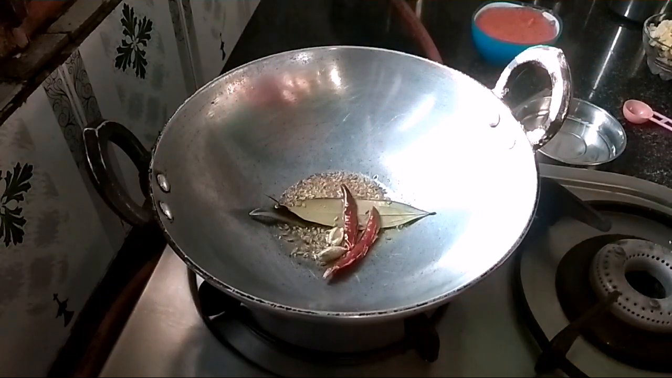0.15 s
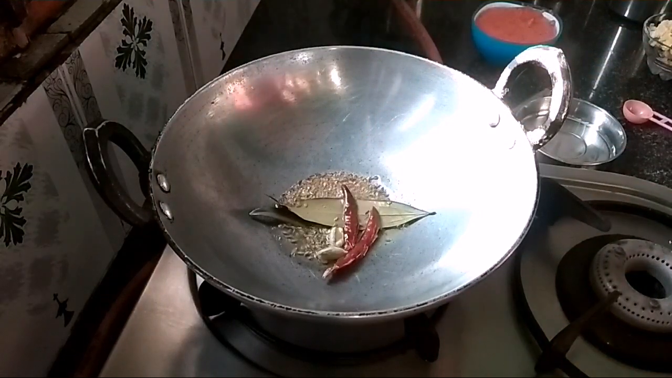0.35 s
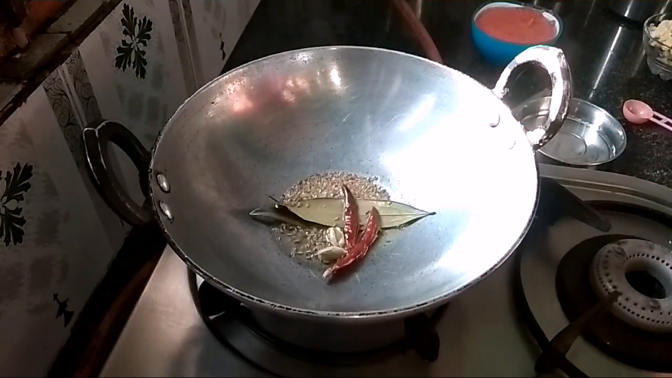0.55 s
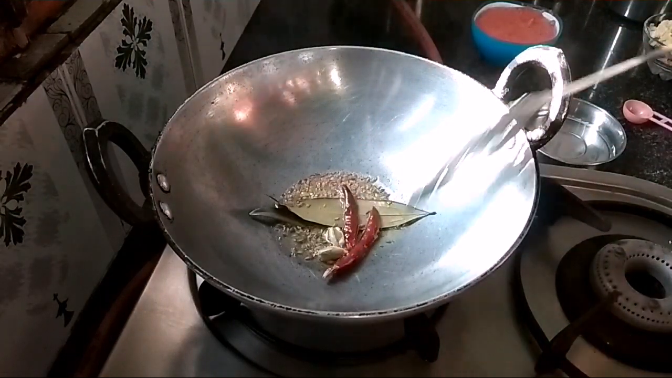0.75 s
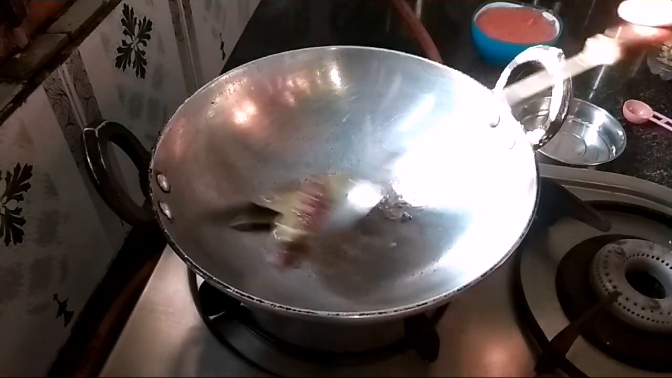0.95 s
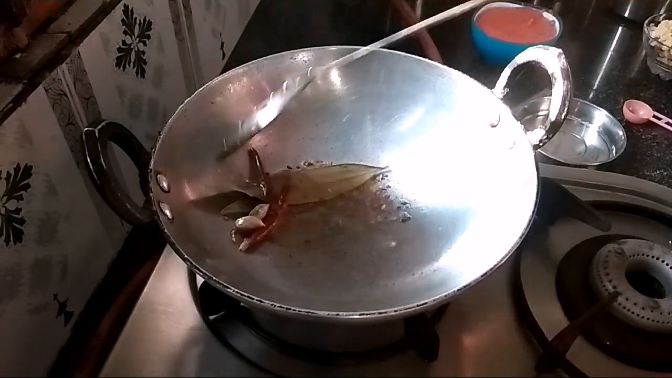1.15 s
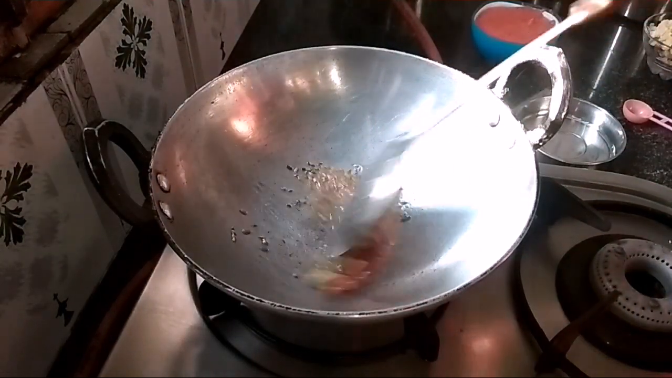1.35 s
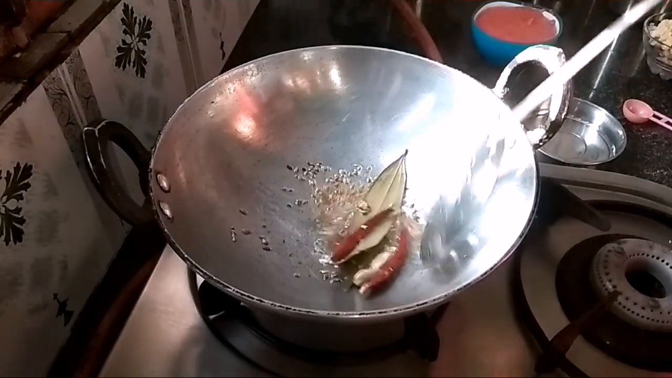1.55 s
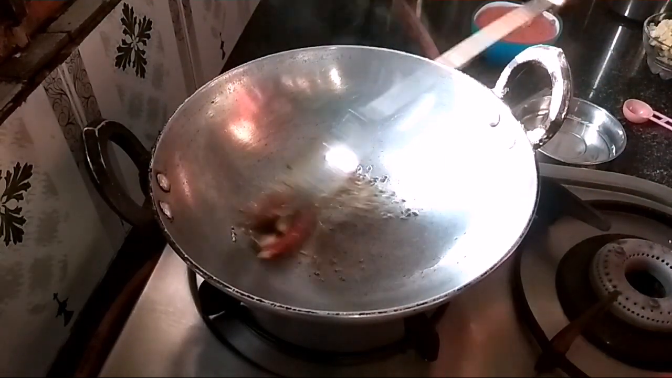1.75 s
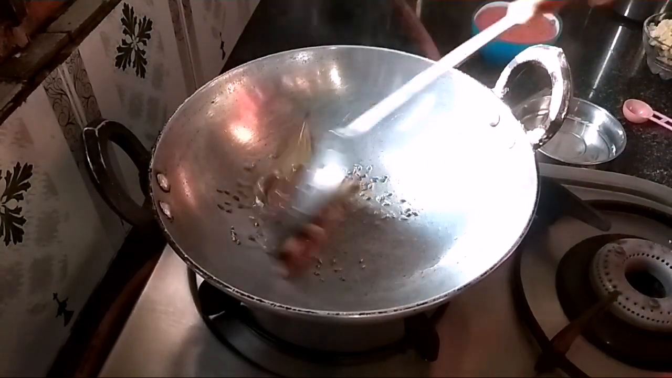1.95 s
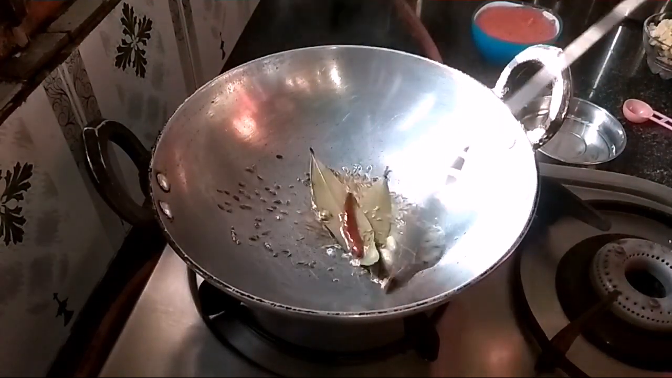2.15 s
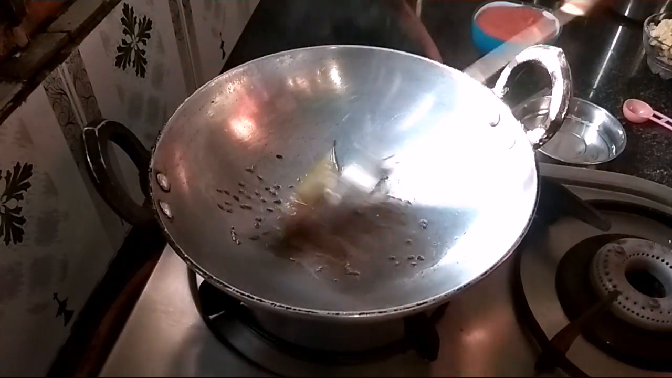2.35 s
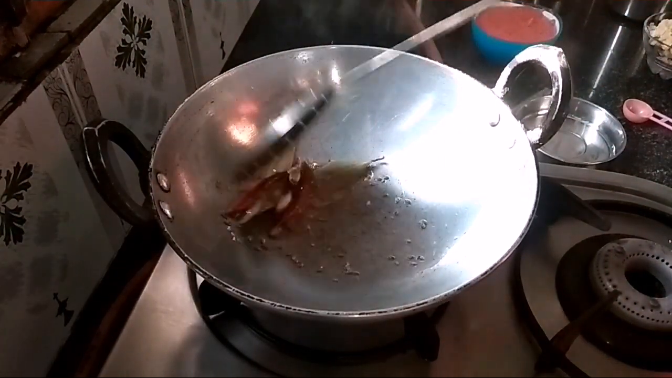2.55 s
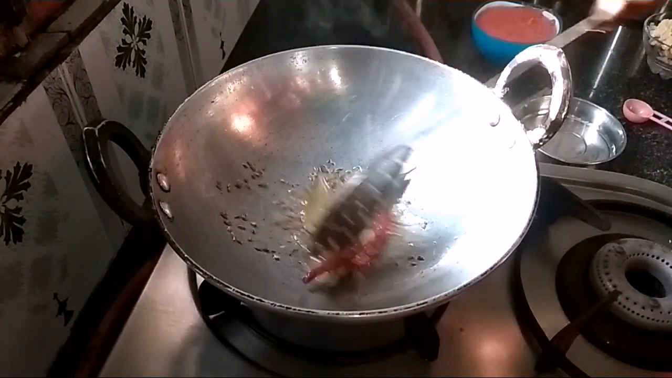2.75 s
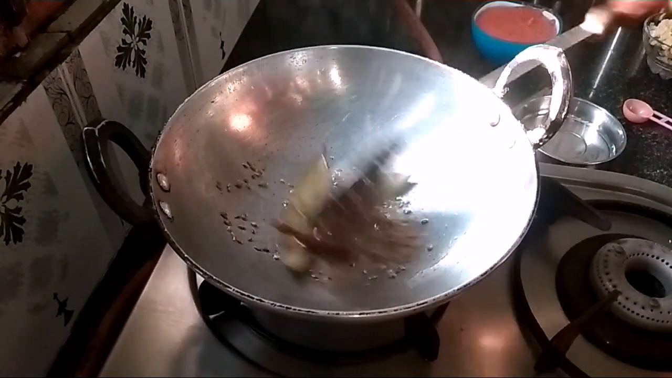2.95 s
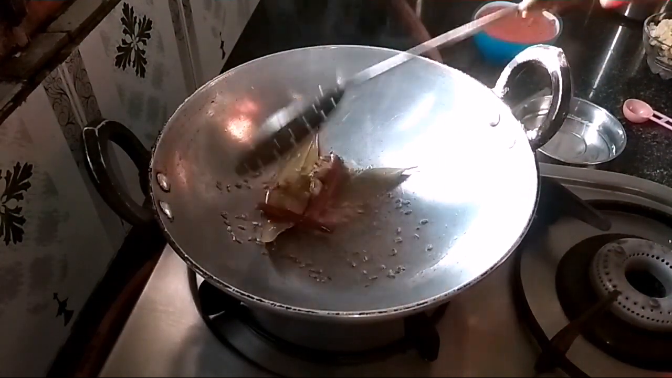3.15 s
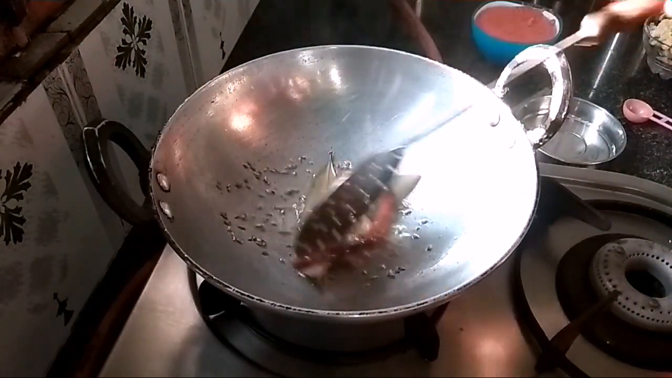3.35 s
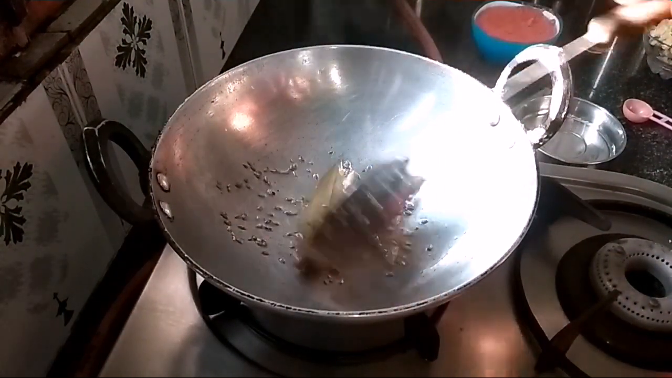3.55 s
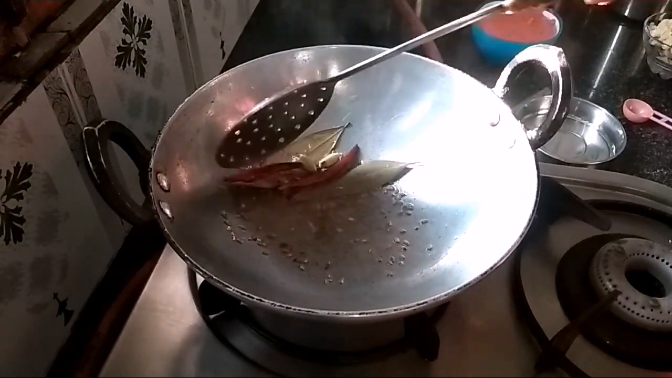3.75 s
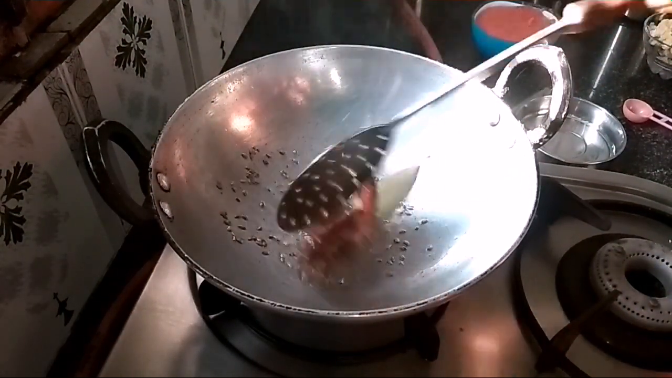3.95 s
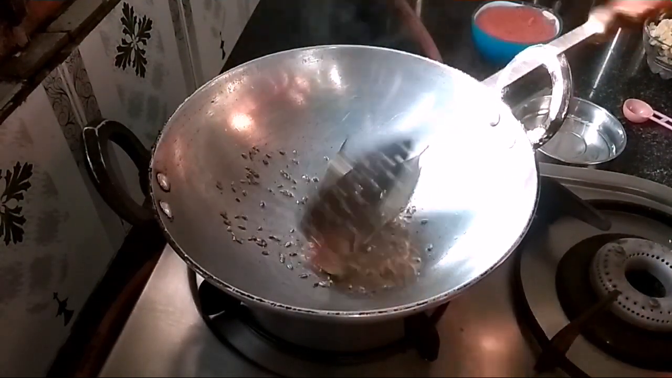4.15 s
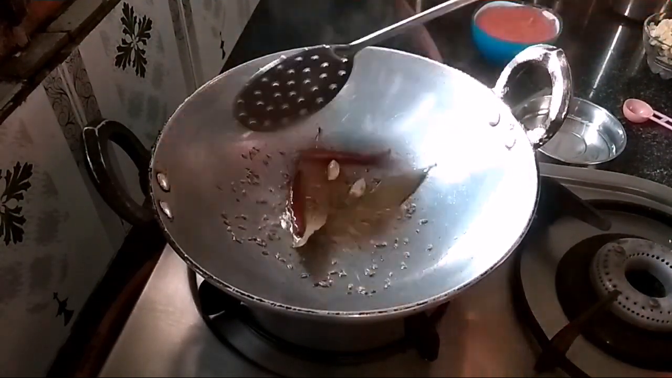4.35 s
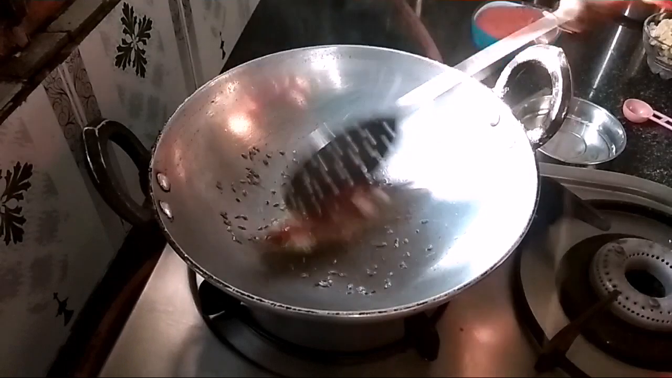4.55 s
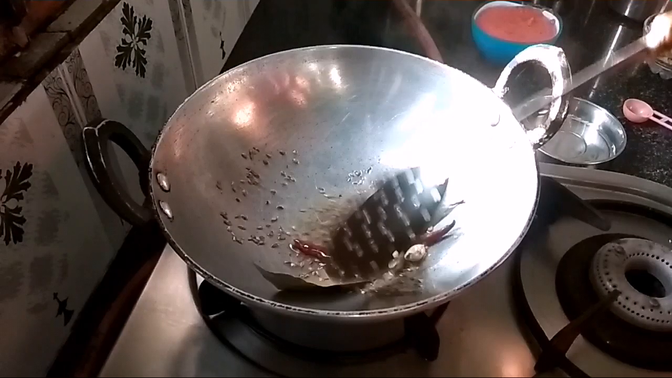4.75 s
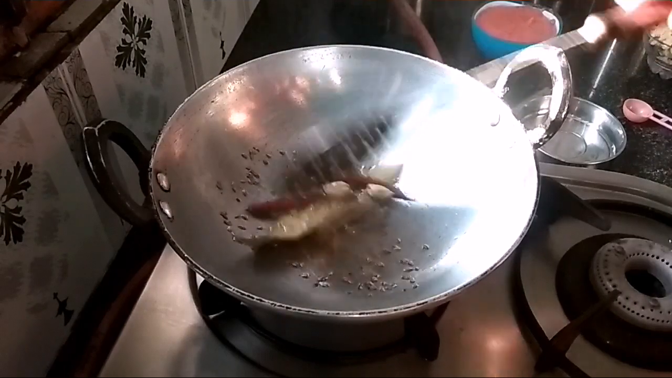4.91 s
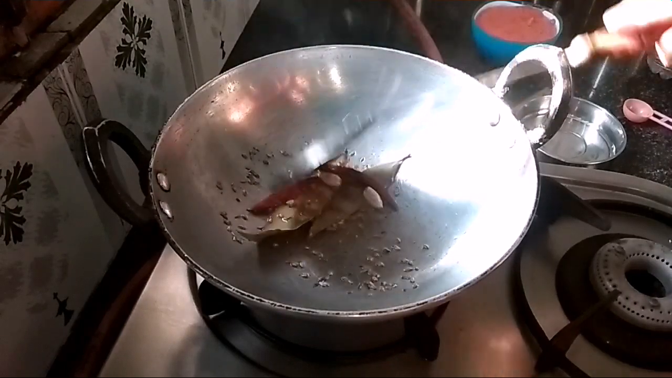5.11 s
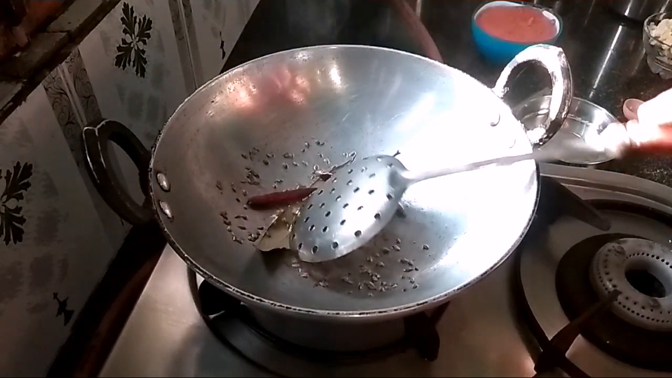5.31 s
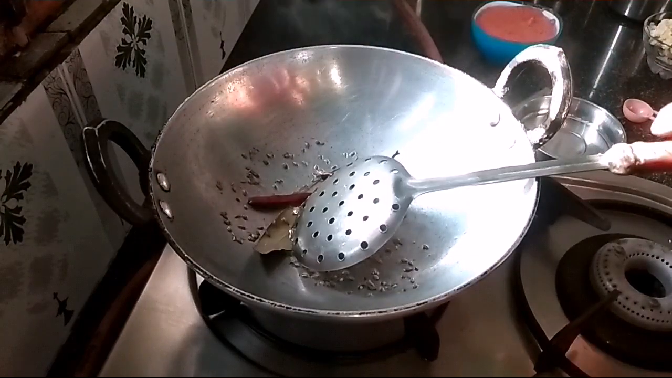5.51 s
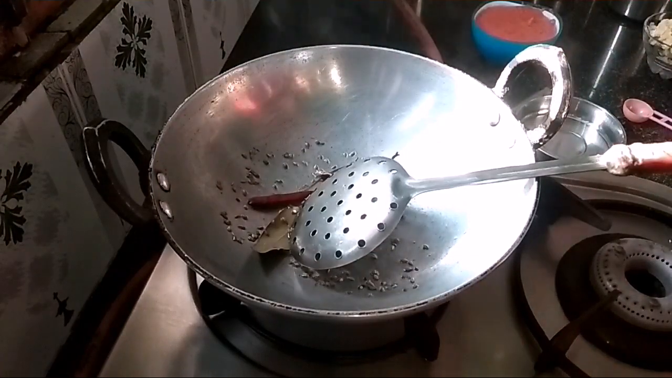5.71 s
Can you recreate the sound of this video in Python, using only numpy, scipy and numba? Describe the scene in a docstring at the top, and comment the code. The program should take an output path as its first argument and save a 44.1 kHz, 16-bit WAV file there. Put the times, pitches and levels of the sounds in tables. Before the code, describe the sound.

Close frying sizzle flares with sharp pops as a metal spoon clanks in a wok, then brisk brushing strokes over a faint stove hum.

```python
"""Spices frying in ghee

Whole spices fry in a thin metal wok close to the microphone: noise clicks through band-passes fizz, short rings
pop. Noise bursts and decaying modes make a slotted steel spoon knock and scrape round the pan as the fat flares
up. From halfway on, dense clicks through gliding resonances swish to and fro like a stiff brush. Below lie a
gas burner of coloured noise, a brief draught and a low hum of steady sines, all in a small kitchen."""
import sys
import numpy as np
from scipy import signal
from scipy.fft import rfft, irfft, next_fast_len
from scipy.io import wavfile
from numba import njit

SR = 44100
rng = np.random.default_rng(int(sys.argv[2]) if len(sys.argv) > 2 else 0)


def put_to_file(sound):
    """Save the sound as 16-bit audio at rate SR, in the file named by the first command-line argument."""
    columns = np.atleast_2d(sound).T  # one column per channel
    safe = np.clip(columns, -1, 1)
    whole_steps = np.round(safe * 32767)
    wavfile.write(sys.argv[1], SR, whole_steps.astype(np.int16))


N = 254702
TIME = np.arange(N) / SR  # seconds
TAIL = TIME[:SR // 2]  # half a second for bursts and echoes

# The fat fizzes quietly, flares as the spoon spreads it over hot metal, then sinks in waves.
# Each row: time in seconds, relative level in dB.
FIZZ_LEVEL = [(0, -53.5), (.25, -56), (.45, -50.5), (.92, -54.5), (1.05, -42.5), (1.16, -37.5), (1.2, -32),
              (1.3, -25.5), (1.45, -27.5), (1.58, -28), (1.67, -32.5), (1.77, -29), (1.83, -31.5),
              (1.97, -36.5), (2.1, -32), (2.28, -39), (2.43, -38), (2.62, -35), (2.95, -42), (3.3, -41),
              (3.56, -47.5), (4.1, -41), (4.7, -45), (5.1, -46), (5.45, -52), (5.78, -61)]
# Tone of the fizz and of the spitting drops. Each row: frequency in Hz, relative level in dB.
FIZZ_COLOUR = [(290, -22), (500, -41.5), (1300, -3.5), (1460, -1.5), (2290, -3), (3340, 2.5), (4150, 2.5),
               (7750, 2), (12100, 9.5), (14900, 1.5), (16000, 4.5)]
# Bubble pitch at each frying spot. Each entry: band centre in Hz.
SPOT_HZ = [2200, 4300, 6300, 8300, 10200, 12000, 13800]
# Wet seeds sputter. Each row: start in seconds, relative level in dB, length in seconds, pitch in Hz.
SPUTTERS = [(1.184, -27, .016, 5800), (1.26, -30, .016, 10500), (1.284, -23.5, .018, 4600),
            (1.532, -22, .016, 11500), (1.854, -32, .016, 6400), (2.01, -31, .006, 7600),
            (2.026, -33, 0.011, 5200), (2.348, -33.5, .014, 5200), (5.342, -28, .006, 12200)]
# The biggest steam bubbles burst in the fat; the rows pitched near 1.5 kHz are hard seeds cracking. Each row:
# start in seconds, relative level in dB, pitch in Hz.
POPS = [(0.0142, -7, 12200), (0.018, -23, 3100), (0.056, -25, 9400), (0.0572, -26, 3060),
        (0.3693, -15.5, 2960), (0.4179, -10, 11600), (0.417, -31, 2550), (0.4995, -18.5, 10900),
        (0.497, -26.5, 3940), (0.5399, -14, 11800), (0.5448, -11, 12600), (0.6392, -14, 10400),
        (0.7672, -31, 3670), (0.82, -17.5, 10700), (0.9235, -16, 11800), (1.101, -3.5, 12400),
        (1.117, -7, 11900), (1.152, -8.5, 9800), (1.3024, 5.5, 10800), (1.433, 0, 11000),
        (1.56, -2.5, 12500), (1.6252, -11.5, 3260), (1.626, -2, 11600), (1.9187, -5, 7400),
        (2.0102, -10.5, 7400), (2.098, -19, 1620), (2.156, -8.5, 11700), (2.224, -21.5, 4560),
        (2.3482, -16.5, 4780), (2.4714, -19, 1620), (2.472, -10, 11200), (2.5308, -11.5, 7700),
        (2.5806, -12.5, 3610), (2.631, -19, 3430), (2.636, -8.5, 10300), (2.883, -7, 12000),
        (2.9337, -0.5, 10800), (3.0096, -2.5, 11700), (3.186, -19, 3450), (3.233, -12.5, 12200),
        (3.2731, -7.5, 12900), (3.295, -17, 4300), (3.38, -9, 9900), (3.8545, -14, 3110),
        (3.968, 2.5, 11000), (4.105, -13, 3430), (4.104, -11.5, 10400), (4.132, -11.5, 10200),
        (4.269, 0.5, 11200), (4.3303, 3, 11400), (4.3304, -26.5, 1600), (4.444, -17, 3900),
        (4.4743, -11, 12600), (4.54, -21, 1420), (4.7443, -7.5, 12100), (5.0479, -16, 1670),
        (5.0492, -18.5, 2770), (5.1079, -10, 11500), (5.3443, -6, 11500)]
# Drops of fat land on the microphone port.
# Each row: start in seconds, then relative levels of crack, spray and thump in dB.
SPITS = [(0.2848, -11, -29, -16), (1.436, -18, -35, -25.5)]
# The spoon strikes the pan. Each row: start in seconds, thud level in dB, upper edge of the thud in Hz,
# metallic clash level in dB, chatter decay in seconds, level of the ring left after it in dB (all relative).
KNOCKS = [(0.953, 16, 2150, 16.5, 0.011, -1), (1.3382, 15, 1630, 4, 0.0025, 1.5),
          (1.703, 8, 1950, 12, 0.0053, 0), (2.471, -2.5, 2300, -14.5, 0.0031, -4),
          (3.273, 0.5, 1500, -25, 0.0014, -42), (3.6094, 18, 1770, 13.5, 0.012, -1),
          (4.3291, 12.5, 1520, -26, 0.0015, -12), (4.54, 1, 1640, 3, 0.0019, 3.5),
          (4.9016, 17.5, 1760, 12.5, 0.0026, -3), (5.512, -6, 795, 0.5, 0.012, 4)]
# The spoon is dragged over the metal.
# Each row: start in seconds, time pressed in seconds, relative level in dB, upper edge in Hz.
DRAGS = [(1.284, .012, -22, 1900), (1.349, 0.079, -22, 1370), (1.44, 0.2, -29.5, 550),
         (1.519, 0.017, -26, 1930), (2.043, 0.027, -18.5, 890), (2.315, 0.041, -26, 490),
         (2.786, 0.011, -25.5, 750), (3.654, 0.054, -30, 1710), (4.535, 0.092, -28, 1260),
         (4.827, 0.023, -32, 950), (4.935, 0.12, -34, 2190), (5.509, 0.021, -31.5, 780)]
# Clear modes of the pan. Each row: frequency in Hz, relative level in dB, 60 dB decay in seconds.
PAN_MODES = [(2880, -6, .15), (3370, -1, .2), (5660, -4, .22), (6040, -3, .22), (6605, -7, .3),
             (8753, 0, .22), (9294, 0, .22), (10369, 3, .2), (11155, -2, .25), (11825, 1, .2),
             (13369, 1, .16)]
# The bowl flexing as a whole. Each row: frequency in Hz, relative level in dB, 60 dB decay in seconds.
BOWL_MODES = [(187, -7, .4), (202, -13, .3), (228, -12, .35), (315, -9, .3), (380, -9, .25), (455, -8, .25),
              (550, -10, .3), (734, 4, .18), (818, 6.5, .19), (939, 0, .18), (1290, -4, .15),
              (1468, -3, .12)]
# The pan's crowd of weaker modes. Each row: frequency in Hz, relative level in dB.
PAN_COLOUR = [(100, -18), (190, -2), (400, -3), (560, -4.5), (800, -5.5), (1100, -5.5), (1500, -0.5),
              (2200, -2.5), (4200, 1.5), (6000, 4.5), (10500, 2), (13500, 4), (15500, -36)]
# The dragged rim judders along the wall.
# Each row: centre in seconds, half length in seconds, middle pitch in Hz, relative level in dB.
GROANS = [(4.344, 0.024, 530, -41), (4.428, 0.07, 542, -52), (4.846, 0.021, 815, -43.5)]
# Brush strokes, about three a second. Each row: fastest point in seconds, relative level in dB,
# half length in seconds, middle pitch at that point in Hz.
STROKES = [(2.752, -33.5, 0.094, 4220), (3.127, -32, 0.072, 3730), (3.42, -33, 0.084, 3820),
           (3.713, -33.5, 0.092, 3770), (4.006, -31.5, 0.096, 3570), (4.293, -31, 0.077, 3720),
           (4.577, -31.5, 0.078, 3860), (4.914, -32, 0.091, 3700), (5.285, -31, 0.075, 3735),
           (5.623, -31.5, 0.08, 3840)]
# The bristles' resonances. Each row: multiple of the stroke's pitch, width as a share of its centre,
# relative level in dB.
BRUSH_RESONANCES = [(.6, .36, 6), (1.0, .3, 10), (2.35, .32, 7.5)]
# Tone of the brush. Each row: frequency in Hz, relative level in dB.
BRUSH_COLOUR = [(700, -35), (1200, -6.5), (1800, -10.5), (2400, -6.5), (2850, -8.5), (3200, -2), (4000, -8),
                (5000, -3.5), (5800, 1), (7500, -15), (8600, -9), (10800, -2.5), (12500, -15), (15000, -71)]
# The flame's rush. Each row: frequency in Hz, relative level in dB.
BURNER_COLOUR = [(20, -11.5), (35, 3), (58, -3), (75, -11.5), (130, -14), (250, -21), (500, -27),
                 (1000, -30), (2500, -30.5), (8000, -31.5)]
# Steady tones of the hum. Each row: frequency in Hz, rms level in dB.
HUM = [(49.25, -55), (62.5, -63), (88, -66), (98.7, -55.5), (100, -59)]

FLARE_DB = -24.5  # reference level near the top of the flare
FIZZ_PER_S, FIZZ_DENSITY_LAW = 1500, 1  # bubbles a second per spot at that level; how they thin out below it
FIZZ_PATCHY_DB, FIZZ_PATCHY_HZ = 5, 24  # depth and rate of each spot's fits
SPOT_WIDTH_HZ = 2200
SIMMER_DB, SIMMER_FOLLOW = -29.5, 0.46  # softest middling bubble at FLARE_DB; dB per dB of fizz
SPUTTER_WIDTH = .32  # share of the pitch
PLUMP_CYCLES, SHRILL_CYCLES = 2.3, 1.1  # ring of a deep and of a small bubble
SNAP_DB = -11  # snap of the film against the ring
RAP_HZ, RAP_DB = 1850, -28.5  # the metal's answer to a pop, against the pop's level
SMACK_HZ, SMACK_DB = 1400, 0  # body of a landing drop, against its crack
CRUNCH_DB, WASH_T60_S = 1, 0.63  # unevenness of the chatter; slower decay of the pan's dense ring
DRAG_ATTACK_S, DRAG_RELEASE_S, SLIPS_PER_S = 0.0066, 0.029, 1000
PORT_LAG = 4  # samples by which pan sound is late at the left port
BRISTLES_PER_S = 15000  # flicks of single bristles
BRUSH_SAG, BRUSH_HISS_DB = .24, -4  # share the pitch slides each way; plain hiss of the bristles
TOP_HZ = 15800  # upper limit of the microphone


def liveliness():
    """Level of the fizz in dB at every moment."""
    return np.interp(TIME, *np.transpose(FIZZ_LEVEL))


def fizz():
    """Countless tiny bubbles: each spot has its own size and fits, denser and louder on freshly wetted metal."""
    db = liveliness()
    rate = FIZZ_PER_S * undb(FIZZ_DENSITY_LAW * (db - FLARE_DB))
    out = 0
    for spot, hz in enumerate(SPOT_HZ):
        crackle = clicks(rate, spread_db=4.5)
        fits = FIZZ_PATCHY_DB * unit(lowpass(rng.standard_normal(N), FIZZ_PATCHY_HZ))
        pitched = resonate(crackle, np.full(N, float(hz)), SPOT_WIDTH_HZ / hz)
        voiced = (.3 * crackle + 2 * pitched) * undb(db + fits)
        # each spot lies in a slightly different direction
        out = out + kitchen(voiced, early_db=-3, late_db=-5, lag=spot % 5 + 1, early_t60=.015)
    return undb(-1.0) * colour(out, FIZZ_COLOUR) / np.sqrt(len(SPOT_HZ))


def simmer(count=300):
    """Middling bubbles, each with its own pitch, more of them while the fat is lively."""
    out, db = np.zeros(N), liveliness()
    activity = np.cumsum(undb(db))
    for when, pitch, size, length in rng.random((count, 4)):
        i = np.searchsorted(activity, when * activity[-1])
        hz = 3200 * (13500 / 3200) ** (pitch ** .7)
        base_db = SIMMER_DB + SIMMER_FOLLOW * (db[i] - FLARE_DB)
        loud_db = base_db + 10 * size ** 3 + 11 * pitch  # few are large; shrill ones are louder
        add(out, TIME[i], undb(loud_db) * bubble(hz, 1 + 3 * length ** 2))
    return kitchen(out, early_db=3, late_db=-2, lag=4, early_t60=.02)


def sputters():
    """A wet seed lets off steam: a short, coarse squirt with a pitch of its own."""
    out = np.zeros(N)
    for s, db, length, hz in SPUTTERS:
        coarseness = undb(4 * unit(lowpass(rng.standard_normal(len(TAIL)), 600)))
        grains = rng.standard_normal(len(TAIL)) * coarseness
        squirt = unit(resonate(grains, np.full(len(TAIL), float(hz)), SPUTTER_WIDTH))
        envelope = np.minimum(TAIL / .002, 1) * np.exp(-(TAIL / length) ** 2)
        add(out, s, undb(db) * squirt * envelope)
    return kitchen(out, early_db=-3, late_db=-8, lag=3, early_t60=.015)


def bubble(hz, cycles):
    """A film snaps, and the cavity under it rings for a few cycles."""
    snap = signal.unit_impulse(SR // 40)
    ring = signal.lfilter(*signal.iirpeak(hz, np.pi * max(cycles, .5), fs=SR), snap)
    return ring / np.abs(ring).max() + undb(SNAP_DB) * snap


def pops():
    """Big bubbles burst and seeds crack one by one and rap the metal under them; the small shrill ones get
    stronger echoes."""
    shrill, plump, raps = np.zeros((3, N))
    for s, db, hz in POPS:
        out, cycles = (shrill, SHRILL_CYCLES) if hz > 6000 else (plump, PLUMP_CYCLES)
        add(out, s, undb(db) * bubble(hz, cycles))
        add(raps, s, undb(db + RAP_DB) * bubble(RAP_HZ, 0))
    spray = kitchen(shrill, early_db=-1, late_db=-5, lag=1, early_t60=.014)
    return spray + kitchen(plump + raps, early_db=-6, late_db=-11, lag=1, early_t60=.025)


def spit():
    """A drop hits the port with a sharp crack and a spray, and pushes the diaphragm, which creeps back."""
    crack, spray, thump, smack = np.zeros((4, N))
    for s, crack_db, spray_db, thump_db in SPITS:
        add(crack, s, undb(crack_db) * rng.standard_normal(len(TAIL)) * fade(0.016))
        add(smack, s, undb(crack_db + SMACK_DB) * bubble(SMACK_HZ, 0))
        add(spray, s, undb(spray_db) * (fade(0.96) + fade(0.074)))  # envelope only
        push = -np.cos(2 * np.pi * 9 * TAIL) * fade(0.15)
        add(thump, s + 0.00113, undb(thump_db) * push)
    hiss = colour(crack + spray * rng.standard_normal((2, N)), FIZZ_COLOUR)
    return hiss + smack + lowpass(thump, 2700) * undb([[3.0], [-4.0]])  # thump leans left


def spoon():
    """Blows and drags both sound the pan: a crack, a dense short ring and a few clear modes."""
    blows, taps = knocks()
    rub = drags()
    body = blows + at_ports(rub) + undb(-4.5) * convolve(rub, wash())
    modes = undb(-19) * ringing(PAN_MODES) + undb(-17) * ringing(BOWL_MODES)
    return colour(body, PAN_COLOUR) + convolve(taps + rub, modes)


def knocks():
    """Each blow crunches over seeds for milliseconds and leaves a ring; also gives the push on the clear modes."""
    blows, taps = np.zeros((2, N)), np.zeros(N)
    tap = signal.unit_impulse(len(TAIL))
    for s, thud_db, thud_hz, clash_db, chatter, ring_db in KNOCKS:
        def tone(x):
            """Balance the low thud against the metallic clash."""
            return undb(thud_db) * lowpass(x, thud_hz) - undb(clash_db) * highpass(x, 2820)

        grit, uneven = rng.standard_normal((2, len(TAIL)))
        roughness = undb(CRUNCH_DB * unit(lowpass(uneven, 550)))
        crunch = burst(grit * roughness * np.exp(-TAIL / chatter))
        add(blows, s, tone(at_ports(crunch + 0.13 * tap) + undb(ring_db) * wash()))
        add(taps, s, undb(ring_db + 5) * tone(tap))
    return blows, taps


def drags():
    """Force of the drags: the rim bites, sticks and slips over seeds and metal, and lifts off."""
    force, slips = np.zeros(N), clicks(SLIPS_PER_S, spread_db=3.0)
    for s, pressed, db, edge_hz in DRAGS:
        bite = np.clip((TIME - s) / DRAG_ATTACK_S, 0, 1)
        lift = np.exp(-np.maximum(TIME - s - pressed, 0) / DRAG_RELEASE_S)
        # the tiny offset keeps the filter clear of denormal numbers
        force += undb(db) * lowpass(slips * bite * lift + 1e-18, edge_hz)
    return force


def ringing(modes):
    """Decaying modes, each reaching the two ports with its own phase; energy 1."""
    out = 0
    for hz, db, t60 in modes:
        phase_spread = min(0.99 + hz / 1200, 2)  # ports differ more at high pitch
        phase = rng.uniform(0, 2 * np.pi) + phase_spread * rng.standard_normal((2, 1))
        out = out + undb(db) * np.sin(2 * np.pi * hz * TAIL + phase) * fade(min(t60, .45))
    return unit(out) / np.sqrt(len(TAIL))


def wash():
    """The pan's dense ring, fresh noise at every call; long waves reach both ports alike."""
    shared, apart = rng.standard_normal(len(TAIL)), rng.standard_normal((2, len(TAIL)))
    dense = lowpass(shared, 1170) + highpass(apart, 410, order=1)
    return burst(dense * (fade(WASH_T60_S) + undb(5.0) * fade(0.13)))


def at_ports(x):
    """Sound from the pan reaches the left port a little late."""
    return np.array([np.pad(x, (PORT_LAG, 0))[:len(x)], x])


def groan():
    """For moments the dragged rim sticks and slips at a nearly steady rate."""
    wobble, pressure = (unit(lowpass(rng.standard_normal(N), 64.0)) for _ in range(2))
    turns = 2 * np.pi * np.cumsum(1 + 0.06 * wobble) / SR  # phase of a 1 Hz tone with wobble
    out = np.zeros(N)
    for s, half, hz, db in GROANS:
        envelope = np.exp(-((TIME - s) / half) ** 4)
        out += undb(db + 4.5 * pressure) * envelope * np.sin(hz * turns)
    return out


def brush():
    """Bristles flick and hiss with each stroke; as they splay, a few broad resonances sink."""
    effort, glide = np.zeros((2, N))
    for s, db, half, hz in STROKES:
        travel = (TIME - s) / half
        # the faint skirt keeps the pitch defined between strokes
        power = undb(db) ** 2 * (np.exp(-1.5 * travel ** 2) + 1e-9 / (1 + travel ** 2))
        effort += power
        glide += power * hz * (1 - BRUSH_SAG * np.tanh(travel))
    # the hand never moves evenly
    pitch = glide / effort * (1 + .045 * unit(lowpass(rng.standard_normal(N), 70)))
    grip = undb(2.2 * unit(lowpass(rng.standard_normal(N), 90)))
    out = np.zeros((2, N))
    for ear in range(2):
        bristles = clicks(BRISTLES_PER_S, spread_db=1.5) * grip * np.sqrt(effort)
        out[ear] = undb(BRUSH_HISS_DB) * bristles
        for ratio, width, db in BRUSH_RESONANCES:
            once = resonate(bristles, ratio * pitch, width)
            out[ear] += undb(db) * resonate(once, ratio * pitch, width)
    # the scrubbed surface rings on in a narrow band
    memory = fade(0.56) ** 2
    afterglow = np.sqrt(np.abs(convolve(effort, [memory / memory.sum()])))
    band = [(2750, -7.5), (3120, 21.5), (3300, 24), (3500, 23.5), (4600, 11.5), (7000, -24.0)]  # Hz, dB
    ring = colour(rng.standard_normal((2, N)), band)
    return undb(-2.0) * colour(out, BRUSH_COLOUR) + undb(-3) * afterglow * ring


def stove():
    """The flame's soft rumble, a draught as the arm passes, and a low hum."""
    mid, left, right = colour(rng.standard_normal((3, N)), BURNER_COLOUR)
    flame = undb(-50.5) * unit(mid + .5 * np.array([left, right]))
    passing = np.exp(-((TIME - 2.42) / 0.157) ** 2)
    draught = undb(-35.5) * unit(lowpass(rng.standard_normal((2, N)), 17.0)) * passing
    hum = np.zeros(N)
    for hz, db in HUM:
        hum += undb(db) * np.sqrt(2) * np.sin(2 * np.pi * (hz * TIME + rng.random()))
    return flame + draught + hum


def kitchen(x, early_db, late_db, lag, early_t60, late_t60=0.48):
    """Direct sound reaches the right port lag samples early; pan wall and tiles answer at once, the room later."""
    response = np.zeros((2, len(TAIL)))
    response[0, lag] = response[1, 0] = 1
    for db, t60 in (early_db, early_t60), (late_db, late_t60):
        echoes = rng.standard_normal(response.shape) * fade(t60) * (TAIL > .0005)
        response += undb(db) * unit(echoes) / np.sqrt(len(TAIL))
    return convolve(x, response)


def clicks(rate, spread_db):
    """Random impulses, rate a second, a few much larger than the rest; rms near 1."""
    size = undb(spread_db * np.minimum(rng.exponential(size=N), 4))
    chance = np.clip(rate / SR, 0, 1)
    struck = rng.random(N) < chance
    return struck * rng.choice([-1, 1], N) * unit(size) / np.sqrt(chance)


@njit
def resonate(x, hz, width):
    """Band-pass with a moving centre and gain 1; width is a share of the centre."""
    y, band, low = np.empty(len(x)), 0., 0.
    for i in range(len(x)):
        g = np.tan(np.pi * min(hz[i], .45 * SR) / SR)
        v = (band + g * (x[i] - low)) / (1 + g * (g + width))
        band, low, y[i] = 2 * v - band, low + 2 * g * v, width * v
    return y


def colour(x, points):
    """Causal minimum-phase filter with the shape of the given (Hz, dB) points and unit power gain."""
    hz, db = np.transpose(points)
    size = next_fast_len(2 * N)
    grid = np.log(np.fft.rfftfreq(size, 1 / SR) + 1)
    gain = unit(undb(np.interp(grid, np.log(hz), db)))
    # folding the cepstrum makes the response causal
    cepstrum = irfft(np.log(gain), size)
    cepstrum[1:size // 2] *= 2
    cepstrum[size // 2 + 1:] = 0
    return irfft(rfft(x, size) * np.exp(rfft(cepstrum)), size)[..., :x.shape[-1]]


def lowpass(x, hz):
    """Second-order Butterworth low-pass."""
    return signal.sosfilt(signal.butter(2, hz, fs=SR, output="sos"), x)


def highpass(x, hz, order=2):
    """Butterworth high-pass."""
    return signal.sosfilt(signal.butter(order, hz, "high", fs=SR, output="sos"), x)


def fade(t60):
    """Exponential decay of 60 dB in t60 seconds."""
    return np.exp(-np.log(1000) * TAIL / t60)


def convolve(x, response):
    """Play a sound through a response with one row per channel."""
    return signal.fftconvolve(np.atleast_2d(x), response, axes=-1)[:, :N]


def add(out, s, sound):
    """Mix a short sound in at time s."""
    i = int(s * SR)
    out[..., i:i + sound.shape[-1]] += sound[..., :N - i]


def undb(db):
    """Decibels to gain."""
    return 10 ** (np.asarray(db) / 20)


def unit(x):
    """Scale to rms 1."""
    return x / np.sqrt(np.mean(x ** 2))


def burst(x):
    """Scale a short sound to energy 1."""
    return unit(x) / np.sqrt(x.shape[-1])


def scene():
    """Everything at the stove, the pan and brush a little to the right."""
    frying = fizz() + simmer() + sputters() + pops()
    handling = spoon() + groan() + brush()
    return (frying + handling) * undb([[-.3], [.3]]) + spit() + stove()


def record(dry):
    """The microphone rounds the loudest peaks and cuts the top."""
    return signal.sosfilt(signal.ellip(8, .2, 70, TOP_HZ, fs=SR, output="sos"), np.tanh(dry))


dry = scene()
out = record(dry)
put_to_file(out)
```